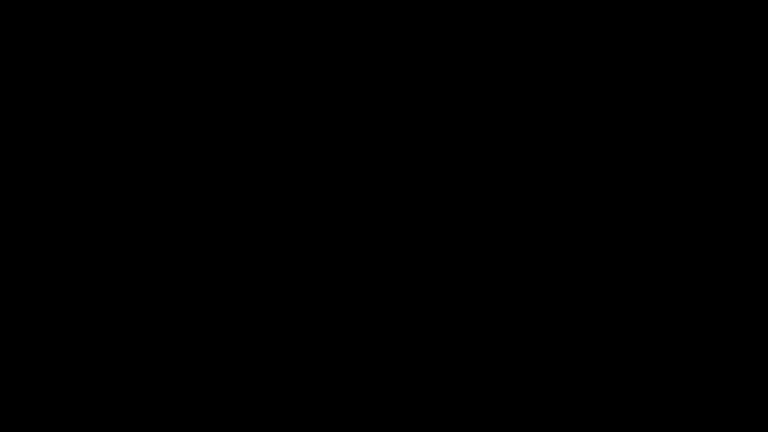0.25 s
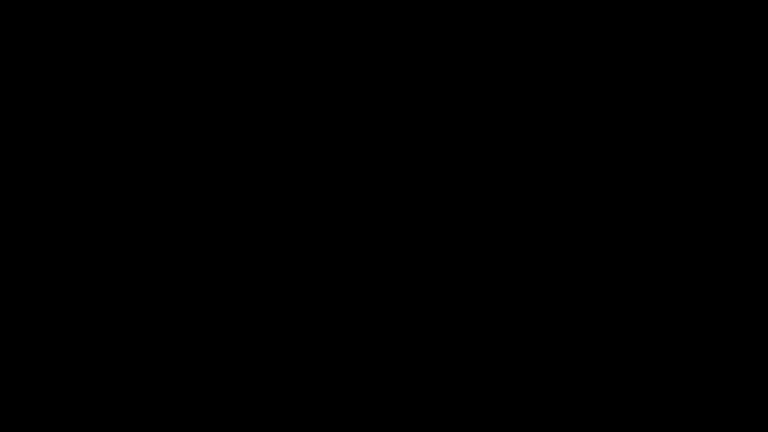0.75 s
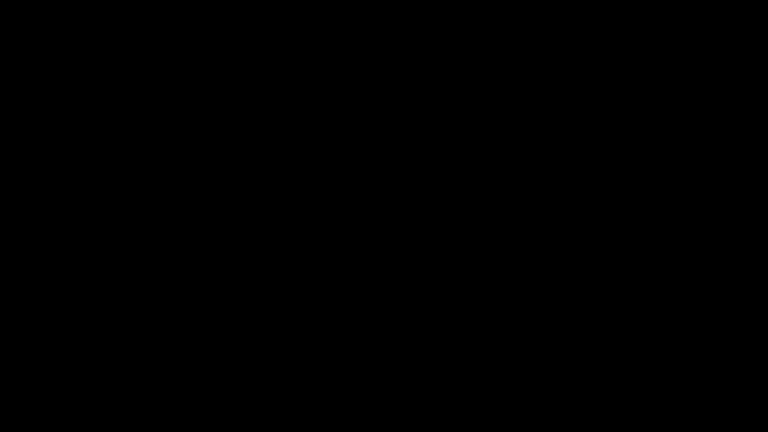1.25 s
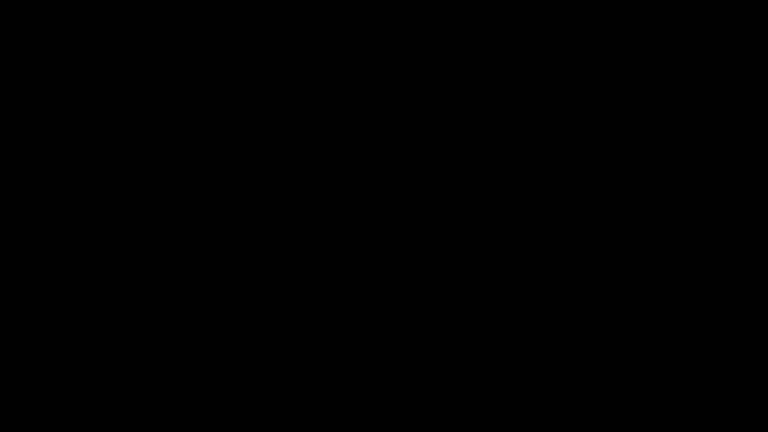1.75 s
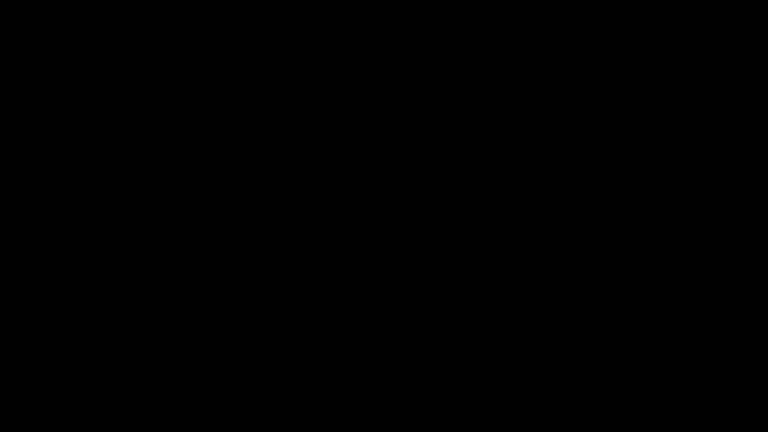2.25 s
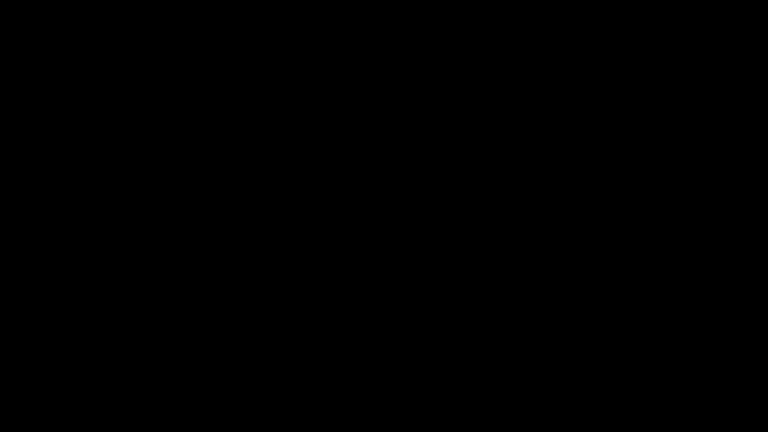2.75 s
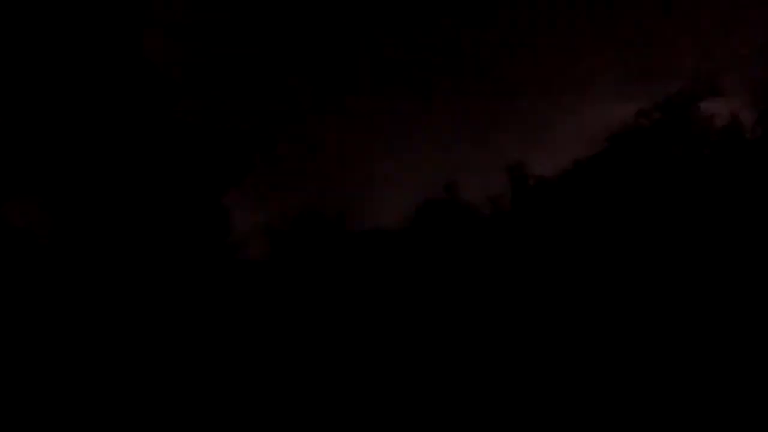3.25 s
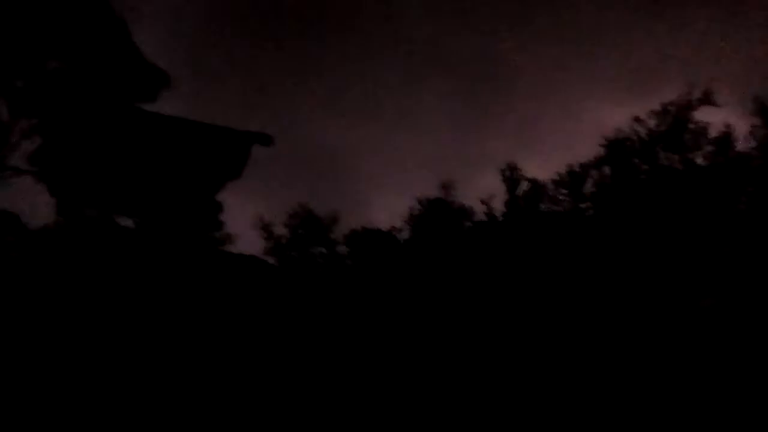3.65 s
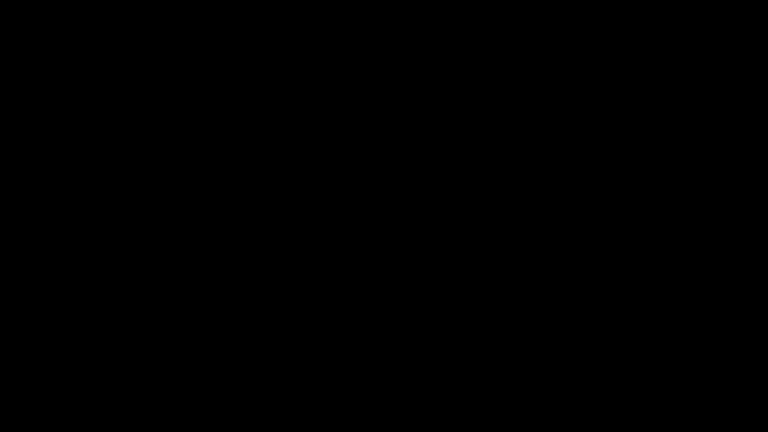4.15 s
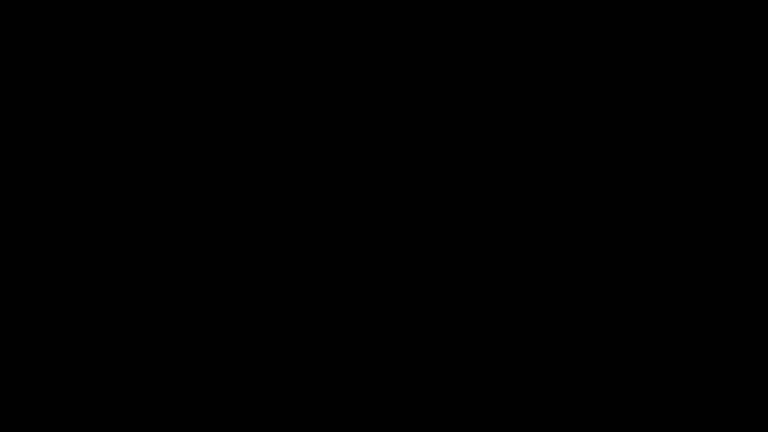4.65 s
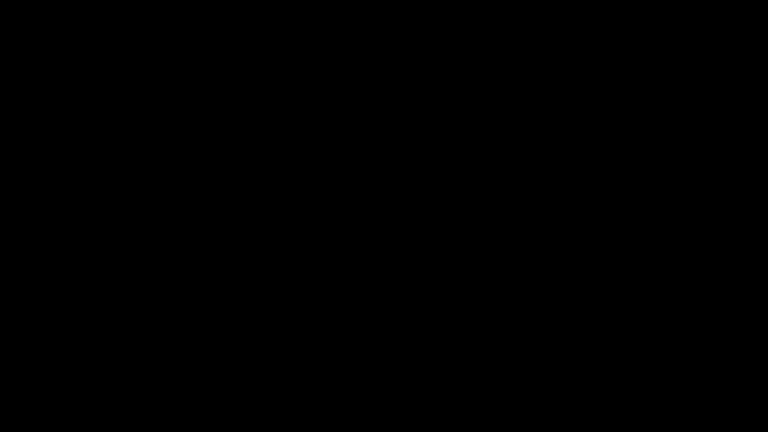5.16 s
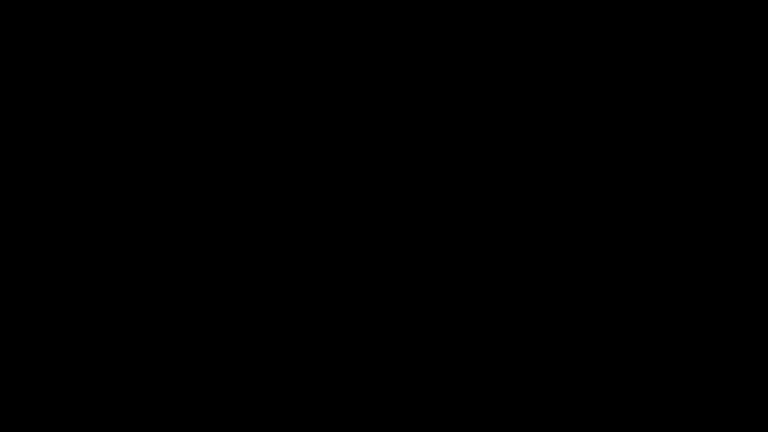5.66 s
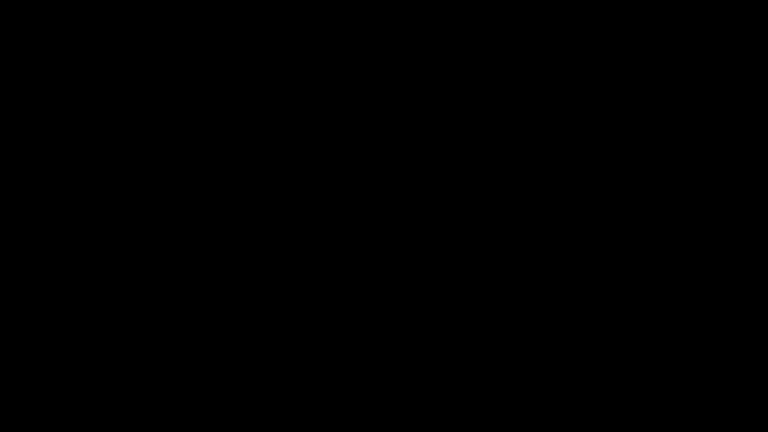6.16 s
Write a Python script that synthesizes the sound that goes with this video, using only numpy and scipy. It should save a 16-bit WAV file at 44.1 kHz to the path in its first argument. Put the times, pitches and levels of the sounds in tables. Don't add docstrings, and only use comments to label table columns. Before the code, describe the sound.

A night garden heard through a small camera microphone with automatic gain and faint hiss. At 0 s a thin, steady tree cricket trill near 3 kHz, weaker higher chirps, a raspy bush cricket and soft leaf rustle are audible. Distant thunder rises from 0.3 s, a dull, deep roll centred around 150 Hz, strong by 1 s and fullest around 1.8 s, without any crack. The garden ducks beneath it, with barely audible gain ticks. A loud, hard roof drop clicks at 2.3 s. The rumble ebbs unevenly from 2.6 s, the insects returning by 4 s, with a renewed low swell near 4.25 s and a weaker one at 5.75 s. Small leaf puffs and faint drops dot the later part; sharp taps and dry snaps come at 4.56, 5.0 and 5.9 s. By 6.4 s the thunder is faint beneath the continuing crickets.

```python
import sys
import numpy as np
from scipy import signal
from scipy.fft import rfft, irfft, next_fast_len
from scipy.io import wavfile
from scipy.ndimage import uniform_filter1d, map_coordinates

SR = 44100
rng = np.random.default_rng(int(sys.argv[2]) if len(sys.argv) > 2 else 0)


def pcm_store(signal):
    levels = np.round(np.clip(np.atleast_2d(signal), -1, 1) * 32767)
    wavfile.write(sys.argv[1], SR, levels.astype(np.int16).T)


def level_to_linear(level):
    exponent = np.asarray(level, float) / 20
    return 10 ** exponent


N = 283563


def unit(x):
    return x / np.sqrt(np.mean(x ** 2) + 1e-20)


def along(points, hz):
    f, v = np.transpose(points)
    return np.interp(np.log(hz + 1), np.log(f + 1), v)


def curves(rows):
    s, *cols = np.transpose(rows)
    return [np.interp(np.arange(N) / SR, s, c) for c in cols]


def wobble(rate_hz):
    coarse = np.arange(0, N + 64, 64)
    knots = rng.standard_normal(int(N / SR * 200) + 4)
    smooth = map_coordinates(knots, [coarse * min(rate_hz, 200) / SR])
    return np.interp(np.arange(N), coarse, smooth)


def coloured(x, spectrum):
    m = next_fast_len(N + 8192)
    gain = level_to_linear(along(spectrum, np.fft.rfftfreq(m, 1 / SR)))
    return unit(irfft(rfft(x, m) * gain, m)[:N])


def shaped(x, spectrum):
    return irfft(rfft(x) * level_to_linear(along(spectrum, np.fft.rfftfreq(len(x), 1 / SR))))


def levelled(x, hold_s):
    wide = max(int(hold_s * SR), 1)
    power = np.abs(uniform_filter1d(uniform_filter1d(x * x, wide), wide))
    return unit(x / np.sqrt(power + 0.056))


def narrow(centre_hz, width_hz):
    slope = [(1, 0), (width_hz / 2, -3), (width_hz, -12), (2.5 * width_hz, -40), (5 * width_hz, -120)]
    a = coloured(rng.standard_normal(N), slope)
    b = coloured(rng.standard_normal(N), slope)
    turn = 2 * np.pi * np.cumsum(centre_hz * np.ones(N)) / SR
    return unit(a * np.cos(turn) + b * np.sin(turn))


def gate(rows, edge_s):
    t = np.arange(0, N / SR + .01, .002)
    gain = np.zeros(len(t))
    for s, span_s, db in rows:
        gain += level_to_linear(db) * np.clip(np.minimum(t - s, s + span_s - t) / edge_s + .5, 0, 1)
    return np.interp(np.arange(N) / SR, t, gain)


def patchy(depth_db, size):
    z = signal.stft(rng.standard_normal(N), nperseg=512)[2]
    field = rng.standard_normal(z.shape)
    field = uniform_filter1d(uniform_filter1d(field, size, 0), size, 1)
    return signal.istft(z * level_to_linear(depth_db * unit(field)), nperseg=512)[1][:N]


def marks(rows):
    out = np.zeros(N)
    out[[round(s * SR) for s, db in rows]] = level_to_linear([db for s, db in rows])
    return out


# (time [s], gain [dB])
GAIN_CONTROL = [
    (0.0, -1),
    (.5, -.6),
    (1.09, -3),
    (1.66, -7.5),
    (1.93, -11),
    (2.49, -8),
    (2.99, -4.5),
    (3.5, -2.5),
    (4.15, -.3),
    (6.43, .1),
]
# (time [s], level [dB])
BREEZE_LEVEL = [
    (0.0, .3),
    (.3, .4),
    (.6, -3.5),
    (3.5, -3),
    (4.15, .4),
    (4.4, -3.5),
    (4.9, -1.2),
    (6.3, .2),
    (6.43, -1.5),
]
# (frequency [Hz], level [dB per Hz])
AIR_SPECTRUM = [(450, -120), (700, 3), (1000, -0.5), (1500, -6.5), (2200, -16.5), (3000, -24), (4500, -120)]
# (frequency [Hz], level [dB per Hz])
LEAF_SPECTRUM = [(1500, -120), (2200, 3), (3600, 1), (5000, -4.5), (6500, -8.5), (7600, -14.5),
                 (8200, -27.5), (11000, -32), (13000, -120)]


def foliage():
    (gain_db,), (breeze_db,) = curves(GAIN_CONTROL), curves(BREEZE_LEVEL)
    air_db = -49.7 + .85 * gain_db + .25 * breeze_db
    leaves_db = -60.5 + 1.05 * gain_db + breeze_db
    air = level_to_linear(air_db) * coloured(patchy(2.0, size=5), AIR_SPECTRUM)
    leaves = level_to_linear(leaves_db) * coloured(patchy(3.5, size=6), LEAF_SPECTRUM)
    return air + leaves


# (time [s], wing resonance [Hz], trill over the far chorus [dB])
TREE_CRICKET = [(0, 3040, -4), (.35, 3050, -1), (.7, 3020, -2), (1.0, 3040, -1), (1.3, 3020, -2),
                (1.6, 3000, 1), (1.95, 3000, -2), (2.45, 3005, 0), (2.8, 2980, -3), (3.28, 2960, -3),
                (3.48, 3055, 2), (3.85, 3030, 0), (4.2, 3045, 1), (4.8, 3050, 0), (5.25, 3010, -4),
                (5.75, 3020, -5), (6.1, 3075, 2), (6.43, 3040, -4)]


def tree_crickets():
    (gain_db,) = curves(GAIN_CONTROL)
    wing_hz, trill_db = curves(TREE_CRICKET)
    stroke_hz = np.linspace(66.5, 66.7, N) + .1 * wobble(4)
    strokes = 2 * np.pi * np.cumsum(stroke_hz) / SR
    trill = np.zeros(N)
    for k in range(43, 49):
        resonance = 1 / (1 + ((66.6 * k - wing_hz) / 60) ** 2)
        fade = level_to_linear(2.6 * wobble(11))
        trill += resonance * fade * np.sin(k * strokes + .6 * wobble(16))
    blur = .75 * narrow(3035, width_hz=220)
    chorus_db = -58.2 + gain_db + 1.1 * wobble(6)
    return level_to_linear(chorus_db) * unit(level_to_linear(trill_db) * unit(trill) + blur)


# (time [s], length [s], level [dB])
LOW_CHIRPS = [(.0, .12, -74), (.54, 0.078, -77), (.83, .07, -75), (1.25, 0.14, -74), (1.5, .07, -83),
              (1.84, .06, -86.5), (2.13, .06, -86.5), (2.55, .09, -76), (2.9, 0.1, -78.5),
              (3.26, 0.07, -76), (3.61, .12, -76), (3.96, 0.11, -75), (4.33, 0.063, -74),
              (4.68, 0.064, -84), (5.045, 0.095, -71), (5.4, 0.068, -70.5), (5.82, .12, -74),
              (6.2, 0.11, -80)]
# (time [s], length [s], level [dB])
HIGH_CHIRPS = [(.03, 0.14, -76), (.44, .14, -80), (.7, .07, -77), (.94, .11, -79.5), (1.28, 0.11, -79.5),
               (1.53, 0.071, -81.5), (1.82, .08, -91.5), (2.1, 0.068, -93.5), (2.36, .05, -87.5),
               (2.88, .1, -85), (3.42, 0.15, -79.5), (3.7, 0.18, -80), (3.97, 0.21, -80), (4.29, .14, -79),
               (4.55, 0.135, -90), (4.79, 0.2, -86), (5.1, .15, -85), (5.37, .09, -77), (5.65, 0.079, -75),
               (5.87, .14, -80), (6.2, .1, -79)]
# (time [s], length [s], level [dB])
BUSH_RASPS = [
    (0, 0.12, -71),
    (.5, .13, -77),
    (1.24, 0.18, -78.5),
    (2.58, .06, -81),
]


def crickets():
    def throb(rate_hz):
        return 1 + .4 * np.sin(2 * np.pi * rate_hz * np.arange(N) / SR)

    low = gate(LOW_CHIRPS, .02) * throb(42) * .8 * narrow(7180, width_hz=30)
    high = gate(HIGH_CHIRPS, .025) * throb(30) * .8 * narrow(7480, width_hz=36)
    bush = gate(BUSH_RASPS, .04) * narrow(7120, width_hz=330)
    return low + high + bush


# (time [s], length [s], level
# [dB], centre [Hz])
PUFFS = [(0.288, .1, -68, 5500), (0.943, 0.025, -58, 3500), (1.477, .03, -66.5, 3800),
         (1.719, .03, -71, 6000), (2.547, 0.076, -72, 5500), (3.124, 0.042, -61, 4000),
         (3.335, .04, -63.5, 4480), (3.94, .1, -61.5, 4800), (4.136, 0.036, -57, 3740),
         (4.235, 0.045, -67, 9500), (4.448, .05, -78, 9500), (4.538, .06, -63, 4960),
         (4.824, 0.048, -65, 5500), (5.019, .045, -63, 9000), (5.078, 0.022, -55.5, 4500),
         (5.365, 0.082, -58.5, 4360), (5.617, .03, -71, 15000), (5.762, 0.047, -56.5, 4500),
         (4.96, .014, -56, 5000), (4.973, .005, -58, 9000), (4.977, .045, -71, 8500),
         (5.866, .01, -56, 4000), (5.88, .016, -68, 8500), (1.727, .01, -69, 15600),
         (5.924, .045, -61.5, 5500), (6.183, 0.046, -54.5, 3770), (6.265, 0.053, -51, 2480),
         (6.33, 0.047, -61.5, 4500)]


def puffs():
    n = 8192
    out, t = np.zeros(N), np.arange(n) / SR
    grain = np.tile(patchy(4.5, size=3), 2)
    for s, span_s, db, hz in PUFFS:
        i = round(s * SR)
        octaves = .8 * (hz / 4000) ** -.85
        away = np.log2(np.fft.rfftfreq(n, 1 / SR) / hz + 1e-9)
        bell = np.exp(-.5 * (away / (0.53 * octaves)) ** 2)
        u = t / span_s
        swell = np.clip(np.minimum(u / 0.32, (1 - u) / .5), 0, 1)
        burst = level_to_linear(db + 1.5) * swell * unit(irfft(rfft(grain[i:i + n]) * bell))
        out[i:i + n] += burst[:N - i]
    return out


# (time [s], peak [dB], ring [Hz], 60 dB fall [s], overtone [dB])
ROOF_DROPS = [(1.2324, -31, 3150, .006, -40), (1.2325, -46, 4750, .008, -40),
              (1.2324, -44, 1600, .006, -40), (2.33, -15.5, 3200, .005, -10), (2.33, -40, 7200, .002, -40),
              (2.33, -50, 11000, .002, -40), (2.33, -56, 13600, .002, -40),
              (2.8283, -44.5, 2800, .008, -25), (3.135, -48, 3200, .008, -18),
              (4.1513, -40, 3070, .01, -25), (4.3857, -43, 3060, .01, -27), (4.545, -46, 3100, .01, -15),
              (4.9751, -26, 3300, .006, -22), (4.9751, -33, 1850, .004, -22),
              (4.9751, -41, 6300, .004, -40), (4.9751, -41, 4500, .004, -40),
              (4.9751, -38, 2500, .004, -30), (4.9755, -32, 1150, .005, -30),
              (4.9985, -37, 3120, .013, -30), (5.0222, -43, 3500, .01, -20), (5.148, -43, 2650, .01, -3),
              (5.8795, -21, 3050, .008, -30), (5.8795, -28, 2600, .004, -30),
              (5.8805, -38, 4500, .005, -40), (5.8797, -52, 9500, .005, -40),
              (5.8865, -39, 3050, .016, -40), (2.33, -28, 2400, .005, -30), (5.8795, -37, 1400, .004, -30),
              (5.894, -42, 3800, .005, -25), (5.8948, -38, 1700, .005, -30), (5.9326, -36, 940, .006, -40),
              (5.9326, -40, 3860, .005, -40), (5.9324, -43, 10600, .003, -40),
              (5.8944, -44, 2600, .004, -30)]
# (frequency [Hz], level [dB per Hz])
SPLAT_SPECTRUM = [(600, -60), (1100, -1), (2400, .5), (4500, -7), (7000, -22), (11000, -36), (14000, -60)]


def drops():
    out, t = np.zeros(N + SR), np.arange(-500, 1500) / SR
    rounded = np.hypot(t, .00012) - .00012

    def decay_db(rise_s, fall_s):
        return -60 * rounded / np.where(t < 0, rise_s, fall_s)

    def blip(hz, rise_s, fall_s):
        return level_to_linear(decay_db(rise_s, fall_s)) * np.cos(2 * np.pi * hz * t)

    mid = signal.butter(3, [2400, 4400], "band", fs=SR)
    for s, db, hz, fall_s, overtone_db in ROOF_DROPS:
        ring = blip(hz, .0037, fall_s)
        ring += level_to_linear(-11) * blip(1.15 * hz, .002, .004)
        ring += level_to_linear(overtone_db) * (blip(5300, .002, .003) + level_to_linear(-6) * blip(8800, .0006, .001))
        spray = unit(shaped(rng.standard_normal(len(t)), SPLAT_SPECTRUM))
        splat = level_to_linear(-8 + .4 * overtone_db + decay_db(.003, .007)) * spray
        tap = level_to_linear(-25) * blip(1700, .004, .008)
        patter = signal.lfilter(*mid, rng.standard_normal(len(t)))
        patter *= level_to_linear(-20 - 60 * np.abs(t) / .04) * (t > 0)
        out[round((s + t[0]) * SR):][:len(t)] += level_to_linear(db) * (ring + tap + splat + patter)
    return out[:N]


# (time [s], peak [dB], body share [dB], low share [dB])
DRY_SNAPS = [
    (1.5817, -60, 2, 2),
    (1.9022, -70, 12, 20),
    (4.2467, -56, 3, 6),
    (4.5603, -40, -3, -5),
    (4.9862, -55, 3, 6),
    (5.0222, -56, 6, 8),
    (5.0324, -29, -1, 1),
    (5.9324, -30, 3, 0),
    (6.3388, -57, 11, 10),
]
# (frequency [Hz], level [dB per Hz])
SNAP_TREBLE = [(5500, -120), (7000, -7), (8700, -1), (10500, -0.5), (12700, -11), (15000, -2), (17000, -3)]
# (frequency [Hz], level [dB per Hz])
SNAP_MIDDLE = [(1200, -42), (2000, -1), (3900, 2), (5900, -2), (7300, -14), (9000, -120)]


def snaps():
    def peak(x):
        return x / np.abs(x).max()

    out, t = np.zeros(N + SR), np.arange(400) / SR
    front = np.exp(-((t - .0017) * SR) ** 2)
    after_s = t - t[74]
    for s, db, body_db, low_db in DRY_SNAPS:
        scatter = (after_s > 0) * level_to_linear(-60 * after_s / .005) * rng.standard_normal(len(t))
        kick = front + .17 * scatter
        treble = peak(shaped(kick, SNAP_TREBLE))
        body = level_to_linear(body_db + 5.5) * peak(shaped(kick, SNAP_MIDDLE))
        thud = level_to_linear(low_db - 2.5 - 60 * np.abs(t - .002) / .005) * np.sin(2 * np.pi * 1100 * t)
        out[round((s - t[74]) * SR):][:len(t)] += level_to_linear(db) * (treble + body + thud)
    return out[:N]


# (time [s], swell [dB], pitch from the roll [octaves])
CLAPS_AND_LULLS = [(0.08, 2.5, 0.8), (0.08, 3.1, -0.6), (0.12, -3.6, 0.3), (0.12, 5.9, 2.2),
                   (0.14, 6.3, -1.0), (0.27, -4.6, -1.4), (0.47, 3.2, 0.9), (0.48, 3.9, -1.8),
                   (0.85, 2.6, -1.3), (0.96, -3.9, -0.4), (1.27, 2.0, 0.5), (1.28, -6.0, -1.6),
                   (1.41, 4.7, 0.6), (1.47, 2.4, -1.4), (1.55, 2.3, 1.0), (1.63, 6.1, -1.5),
                   (1.8, -4.6, 1.7), (1.86, -3.8, 0.5), (1.91, 2.3, -0.2), (2.09, -5.6, -1.8),
                   (2.09, -5.4, -0.5), (2.12, 2.5, 0.4), (2.49, -5.1, -1.0), (2.79, 3.1, -1.5),
                   (2.84, 3.5, -0.9), (2.96, 3.0, 1.5), (3.09, 2.5, 0.6), (3.17, -4.3, -1.1),
                   (3.25, 2.9, 2.2), (3.26, 2.5, -0.7), (3.31, 4.2, 1.5), (3.38, 6.0, -1.6),
                   (3.4, 4.9, 0.8), (3.49, 2.6, 2.2), (3.51, 3.4, 1.2), (3.56, 2.9, -1.4),
                   (3.58, 7.5, -0.7), (3.71, 3.0, -0.9), (3.73, 3.2, 1.7), (4.03, 2.3, -0.2),
                   (4.2, -5.2, -1.6), (4.44, -5.1, -1.6), (4.88, 2.0, -0.1), (4.9, 3.4, -1.3),
                   (5.12, 4.6, 0.8), (5.23, 2.7, 1.4), (5.35, 2.2, -0.7), (5.48, 5.2, 1.9),
                   (5.5, 3.8, -0.4), (5.53, 2.6, 0.8), (5.55, 7.8, -1.8), (5.68, 4.8, -1.1),
                   (5.72, 3.1, -0.3), (5.81, -5.2, 2.2), (6.07, 2.1, -1.0), (6.21, 3.1, -1.8),
                   (6.24, -6.9, -0.8), (6.37, 3.7, -0.6)]


def claps(roar):
    clap_s, clap_octaves, roll_hz = .055, .28, 145
    hz, t, z = signal.stft(roar, SR, nperseg=4096, noverlap=3072)
    octave = np.log2(hz[:200, None] / roll_hz + 1e-3)
    swell_db = 0
    for s, db, pitch in CLAPS_AND_LULLS:
        distance = ((t - s) / clap_s) ** 2 + ((octave - pitch) / clap_octaves) ** 2
        swell_db = swell_db + db * np.exp(-.5 * distance)
    z[:200] *= level_to_linear(swell_db)
    return signal.istft(z, SR, nperseg=4096, noverlap=3072)[1][:N]


# (time [s], strength [dB], brightness [dB], roll pitch setting; the roll centres near 1.6 x setting -
# 94 [Hz])
THUNDER_PEAL = [(0.0, -38.1, -2.0, 146.0), (0.25, -33.6, -7.2, 141.0), (0.6, -25.6, -8.7, 146.0),
                (1.05, -17.3, -9.8, 148.0), (1.45, -15.3, -9.5, 154.0), (1.75, -12.9, -11.9, 146.0),
                (2.2, -14.8, -11.1, 153.0), (2.6, -15.7, -10.8, 149.0), (3.0, -19.3, -8.1, 156.0),
                (3.5, -22.3, -8.0, 143.0), (3.87, -26.3, -10.5, 146.0), (4.25, -23.1, -10.6, 137.0),
                (4.58, -29.5, -11.7, 146.0), (5.05, -29.2, -11.6, 138.0), (5.45, -34.3, -11.1, 137.0),
                (5.75, -27.1, -14.2, 133.0), (6.1, -33.7, -13.3, 141.0), (6.43, -38.3, -12.7, 152.0)]
# (level at mean strength [dB], share of strength, share of brightness, echo build-up [dB/s])
THUNDER_LAYERS = [
    (-38.3, 1.1, 1.5, 1.1),
    (-23.7, 1.01, -.46, 1.24),
    (-30.3, 1.05, 1.01, 2.5),
    (-42, .76, 1.6, 2.9),
]
# (frequency [Hz], level [dB per Hz])
BOOM_SPECTRUM = [(20, -12), (42, -19), (60, -9), (85, 3.5), (110, -14), (140, -120)]
# (frequency [Hz], level [dB per Hz])
GROWL_SPECTRUM = [(130, -120), (185, 1), (240, 2), (300, -1), (400, -10), (470, -23), (600, -120)]
# (frequency [Hz], level [dB per Hz])
EDGE_SPECTRUM = [(320, -120), (400, -4.5), (440, -1), (600, -4.5), (800, -18), (1100, -26.5), (1600, -120)]


def thunder():
    def fronts():
        return (rng.random(N) < 4000 / SR) * rng.standard_normal(N) * level_to_linear(1.6 * wobble(14))

    strength_db, bright_db, roll_hz = curves(THUNDER_PEAL)
    strength_db = strength_db - strength_db.mean()
    bright_db = bright_db - bright_db.mean()
    age_s = np.arange(N) / SR
    age_s = age_s - age_s.mean()
    boom_gain, roll_gain, growl_gain, edge_gain = [
        level_to_linear(db + loud * strength_db + sharp * bright_db + echo * age_s)
        for db, loud, sharp, echo in THUNDER_LAYERS]
    centre_hz = 1.6 * roll_hz - 94 + 6 * wobble(8)
    boom = boom_gain * levelled(coloured(fronts(), BOOM_SPECTRUM), .062)
    roll = roll_gain * levelled(narrow(centre_hz, width_hz=60), .07)
    growl = growl_gain * levelled(coloured(fronts(), GROWL_SPECTRUM), .09)
    edge = edge_gain * levelled(coloured(fronts(), EDGE_SPECTRUM), .09)
    return claps(boom + roll + growl + edge)


def scene():
    garden = foliage() + tree_crickets() + crickets() + puffs()
    return (garden + drops() + snaps() + thunder())[None]


# (frequency [Hz], level [dB per Hz])
PORT_SPECTRUM = [(12500, -120), (13600, -15), (14400, -1.5), (15200, 0.5), (16000, 0.5)]
# (frequency [Hz], level [dB per Hz])
HISS_SPECTRUM = [(3500, -120), (5000, 2), (7500, 0.5), (9000, -2), (11000, -0.5), (13000, -2.5),
                 (14000, -4), (16000, -7)]


def camera_noise():
    port_db = -79 + .95 * curves(GAIN_CONTROL)[0]
    port = level_to_linear(port_db + 7) * coloured(rng.standard_normal(N), PORT_SPECTRUM)
    hiss = level_to_linear(.35 * (port_db + 85) - 83.5) * coloured(rng.standard_normal(N), HISS_SPECTRUM)
    return port + hiss


# (time [s], peak [dB], broad part [dB])
GAIN_STEPS = [(1.02, -53, -24), (1.1013, -71, -15), (1.1402, -70, -16), (1.201, -69, -14), (1.24, -67, -20),
              (1.3203, -54, -23), (1.3602, -63, -23), (1.4001, -61, -20), (1.4605, -64, -18),
              (1.5005, -52, -25), (1.5602, -67, -20), (1.5797, -55, -16), (1.68, -54, -24),
              (1.7403, -54, -24), (1.8002, -64, -21), (1.8805, -60, -23), (1.9598, -63, -22),
              (2.0202, -64, -25), (2.1599, -71, -11), (2.1798, -59, -24), (2.2801, -63, -19),
              (2.3398, -57, -20), (2.3799, -60, -22), (2.4801, -65, -19), (2.5001, -55, -25),
              (2.6198, -64, -13), (2.6597, -62, -19), (2.7001, -67, -20), (2.76, -63, -19),
              (2.7999, -70, -17), (2.8603, -67, -22), (2.961, -67, -17), (3.0399, -73, -15),
              (3.1197, -73, -13), (3.1401, -69, -17), (3.18, -66, -21), (3.2399, -65, -21),
              (3.2803, -63, -23), (3.3816, -66, -21), (3.4005, -66, -21), (4.2002, -60, -23)]


def gain_ticks():
    t = np.arange(36) / SR
    blip = np.sqrt(np.hanning(36)) * np.sin(2 * np.pi * 12000 * t)
    tick = np.pad([-.5, 1, -.5], (16, 17))
    blips = np.convolve(marks([(s, db) for s, db, broad_db in GAIN_STEPS]), blip)
    ticks = np.convolve(marks([(s, db + broad_db + 12) for s, db, broad_db in GAIN_STEPS]), tick)
    return np.pad(blips + ticks, (62, 0))[:N]


def band_limit(x, top_hz):
    m = next_fast_len(N)
    spectrum = rfft(np.pad(x, ((0, 0), (0, m - N)), "reflect"))
    return irfft(spectrum * (np.fft.rfftfreq(m, 1 / SR) < top_hz), m)[:, :N]


def roll_off(x):
    return signal.sosfilt(signal.butter(12, 17060, fs=SR, output="sos"), x)


def record(dry):
    limited = dry / (1 + np.abs(dry / .55) ** 6) ** (1 / 6)
    mix = band_limit(limited + camera_noise() + gain_ticks(), top_hz=15850)
    return roll_off(mix)


dry = scene()
out = record(dry)
pcm_store(out)
```